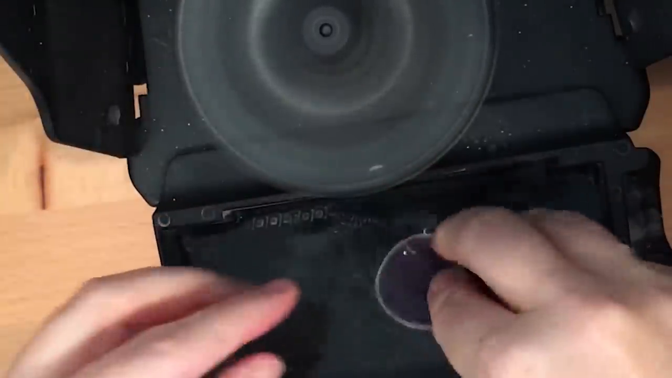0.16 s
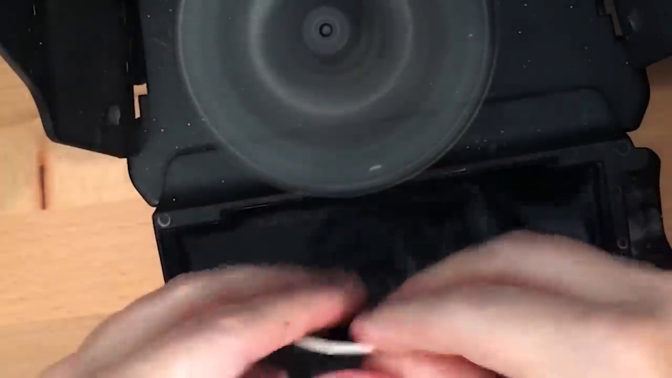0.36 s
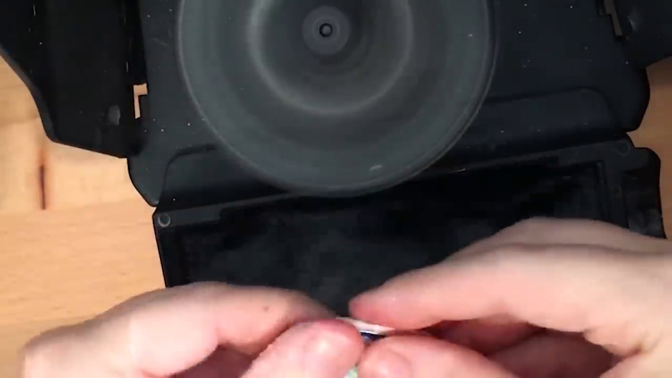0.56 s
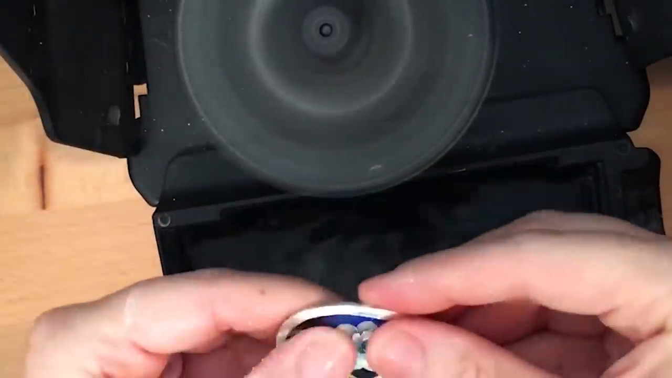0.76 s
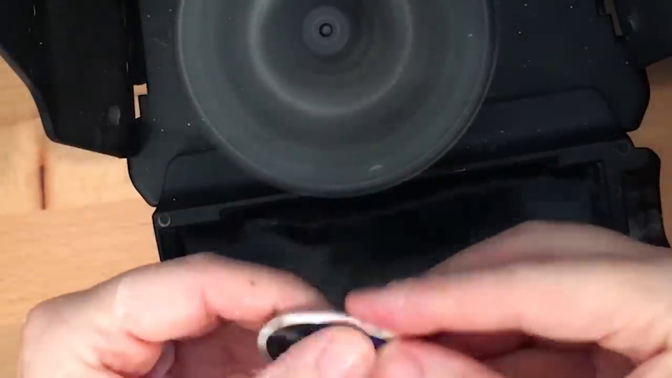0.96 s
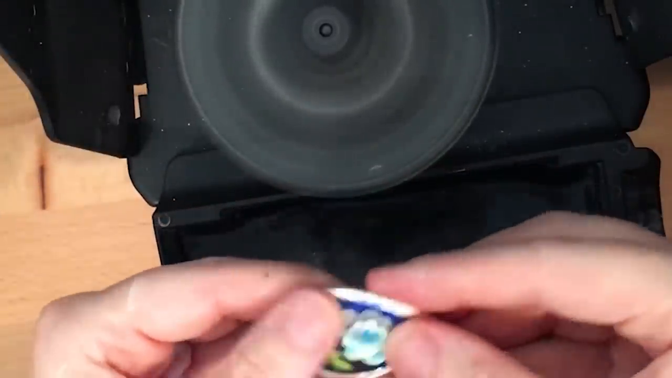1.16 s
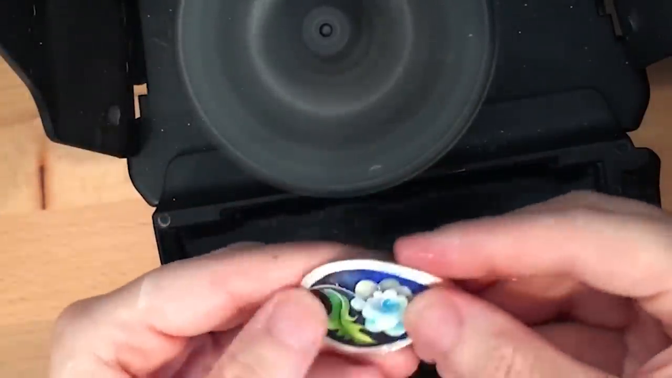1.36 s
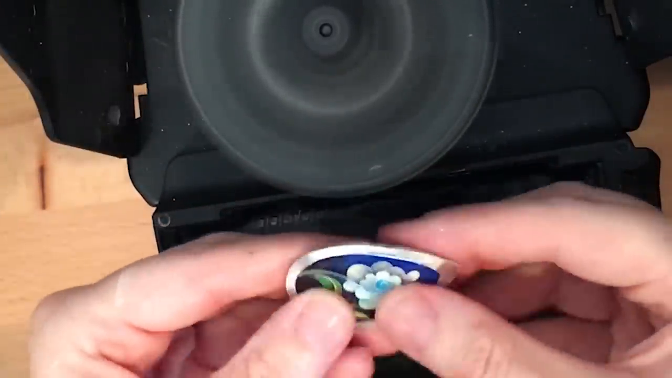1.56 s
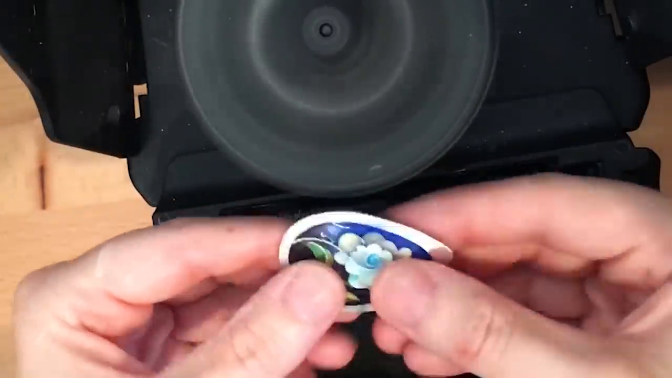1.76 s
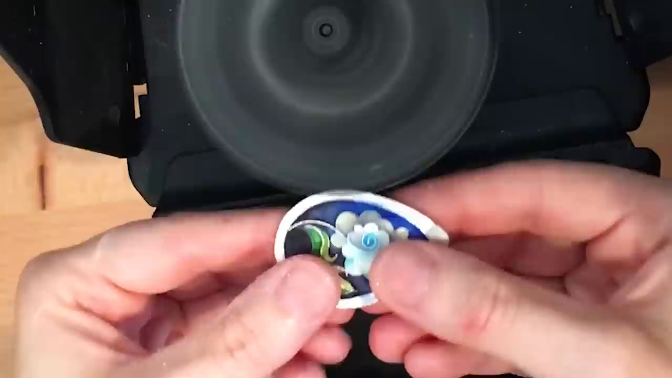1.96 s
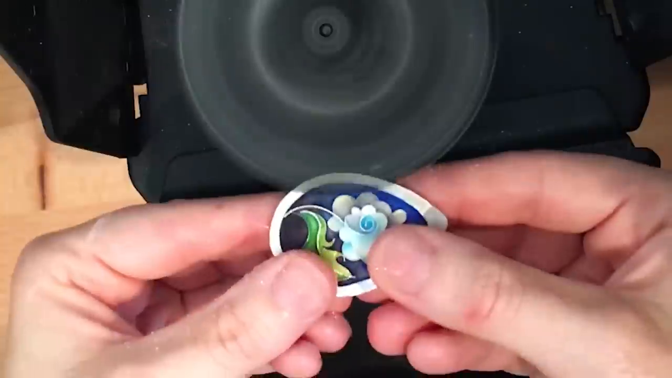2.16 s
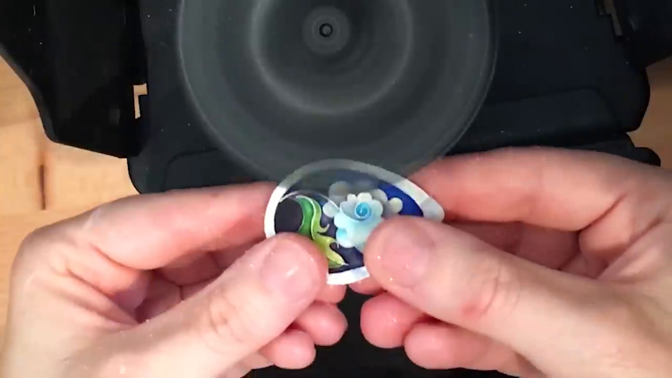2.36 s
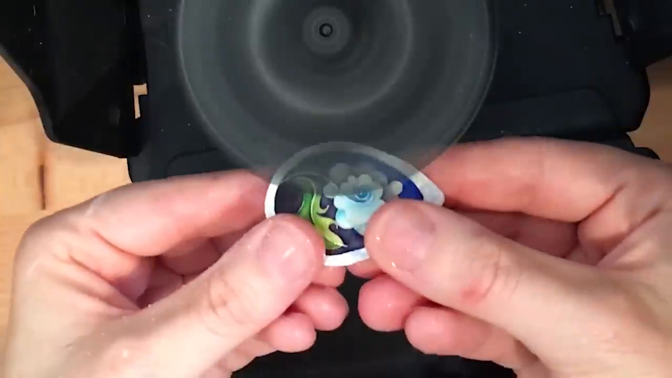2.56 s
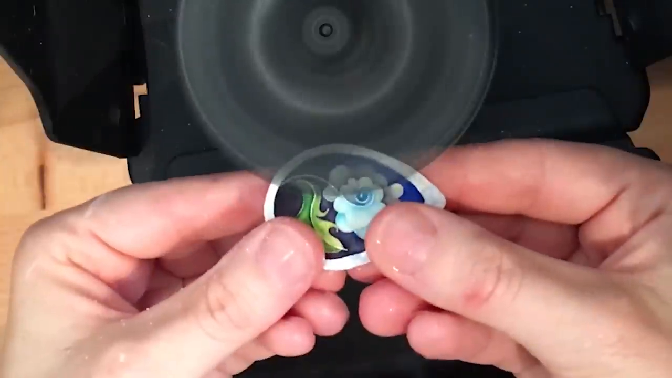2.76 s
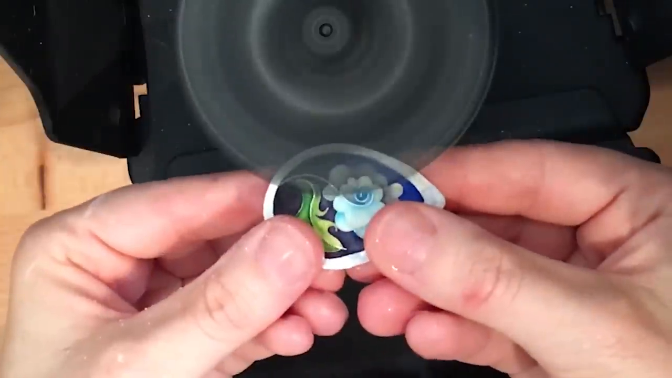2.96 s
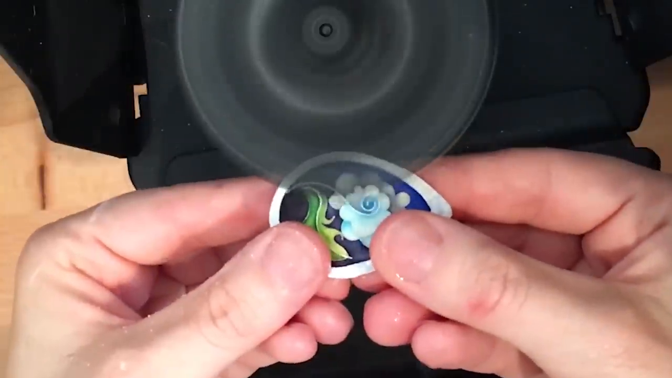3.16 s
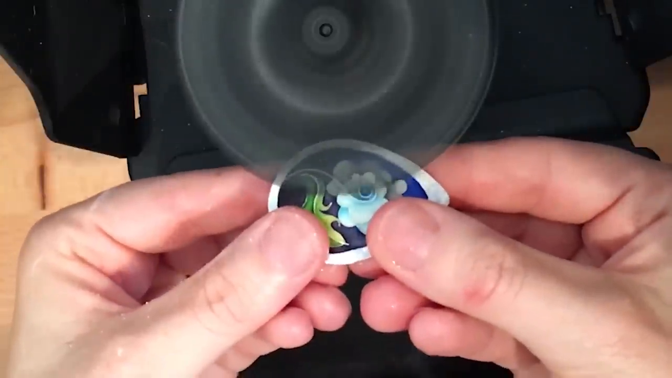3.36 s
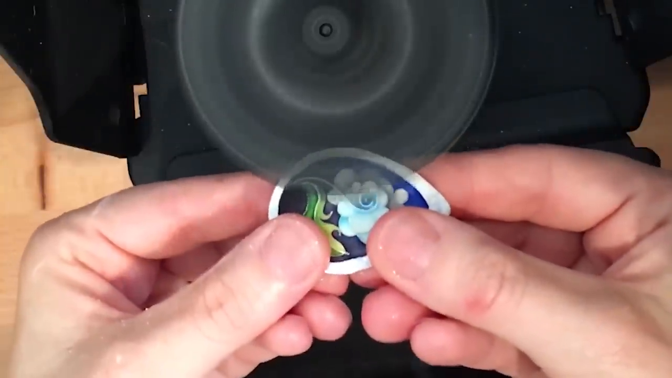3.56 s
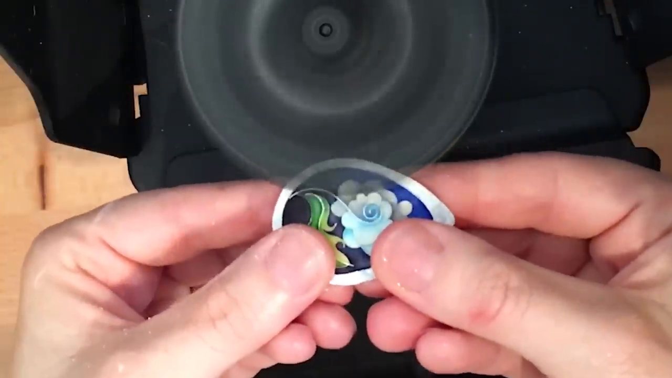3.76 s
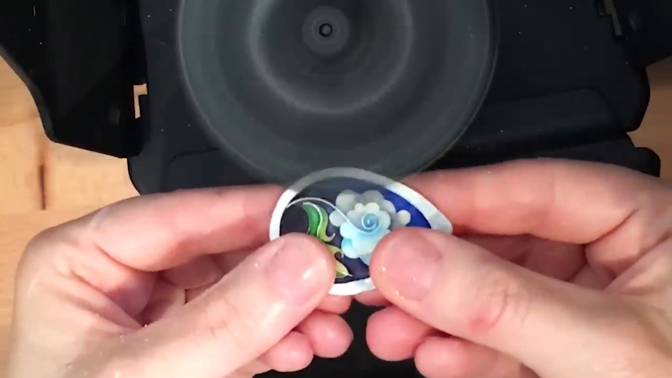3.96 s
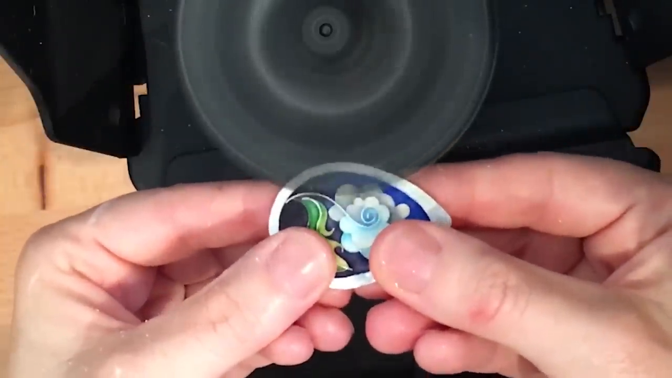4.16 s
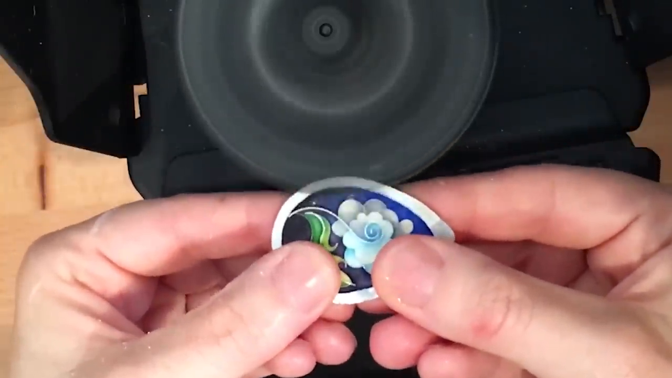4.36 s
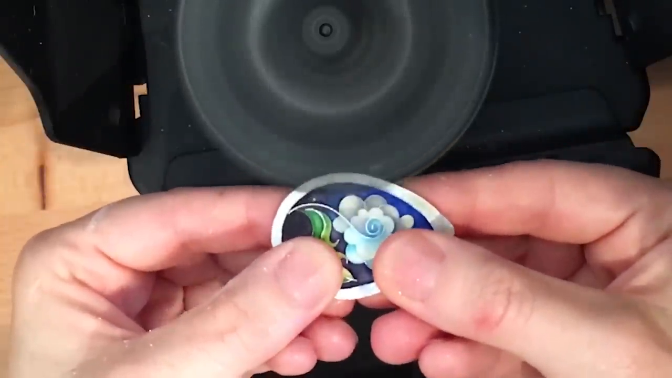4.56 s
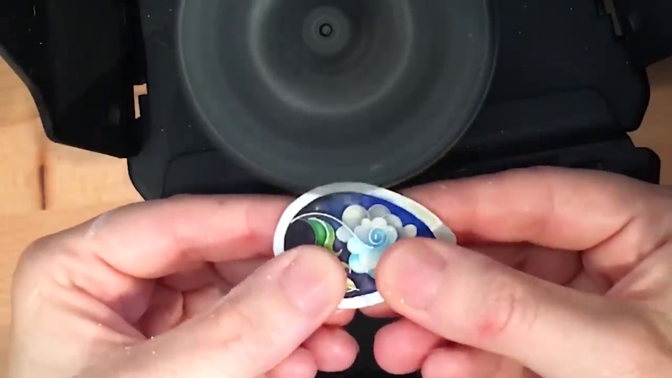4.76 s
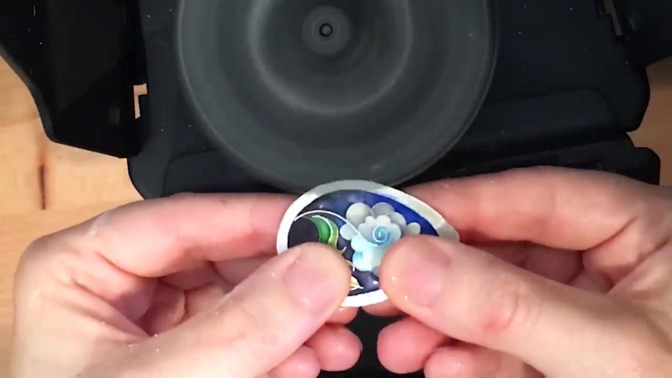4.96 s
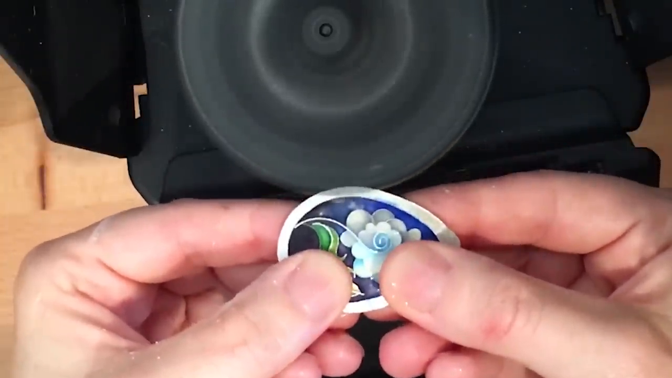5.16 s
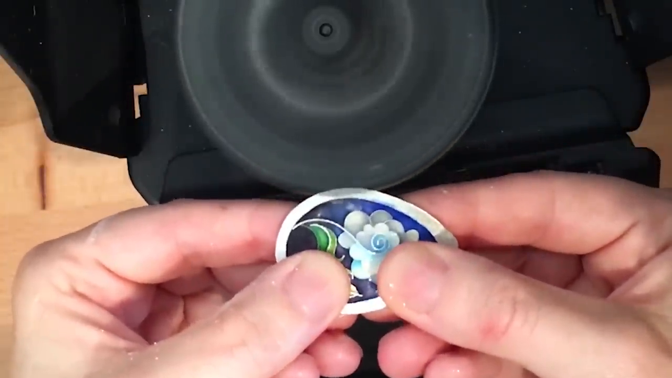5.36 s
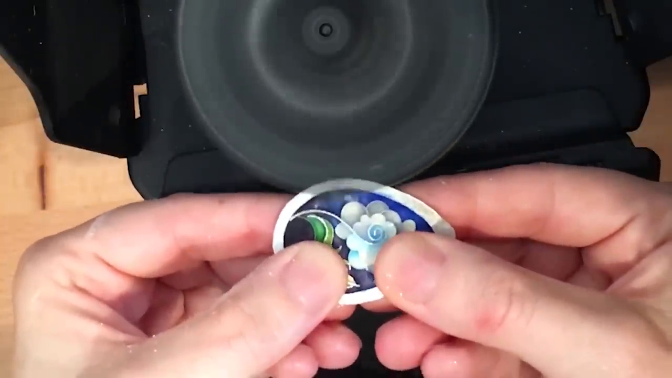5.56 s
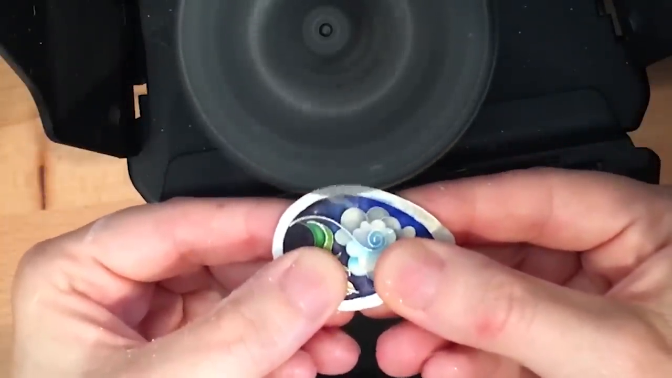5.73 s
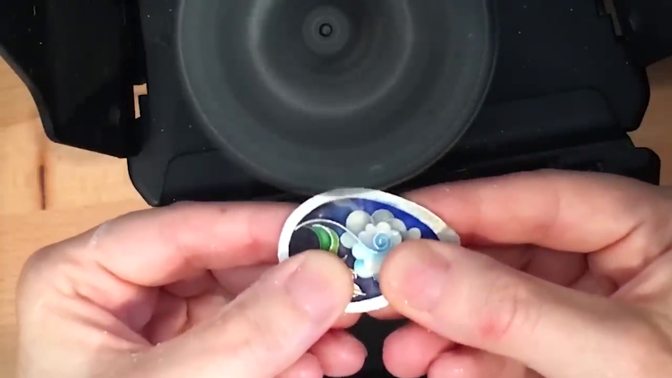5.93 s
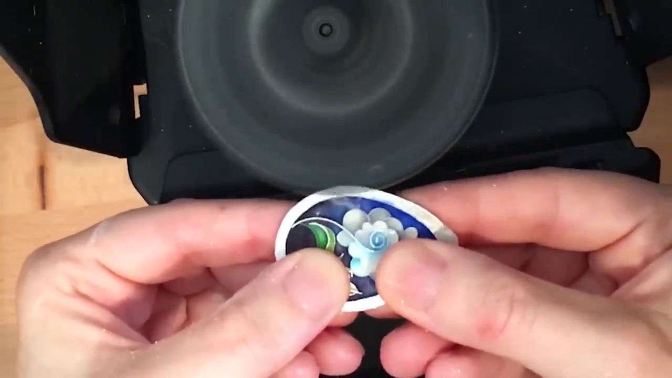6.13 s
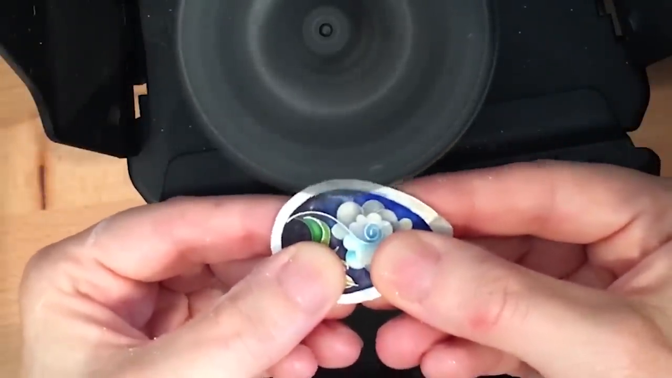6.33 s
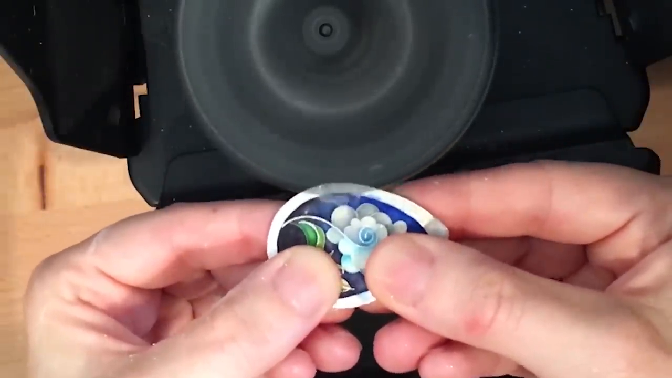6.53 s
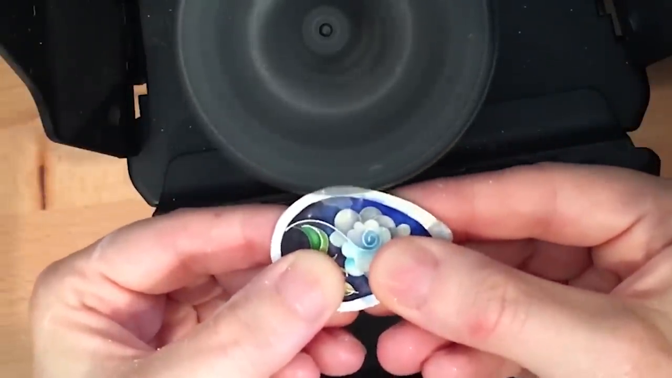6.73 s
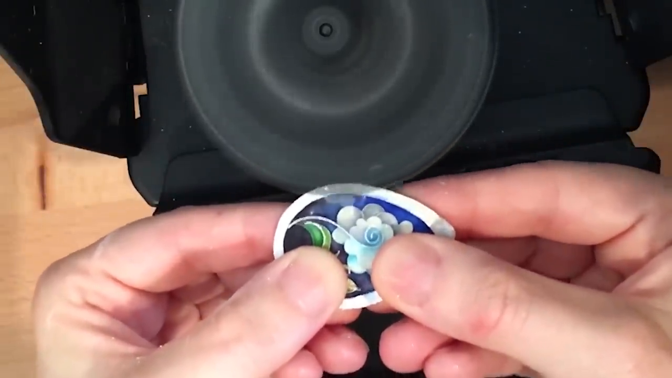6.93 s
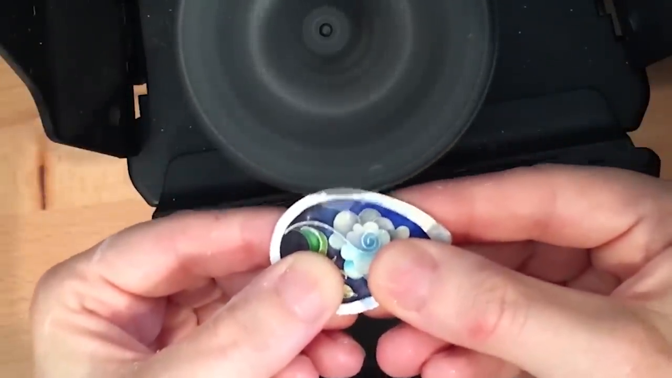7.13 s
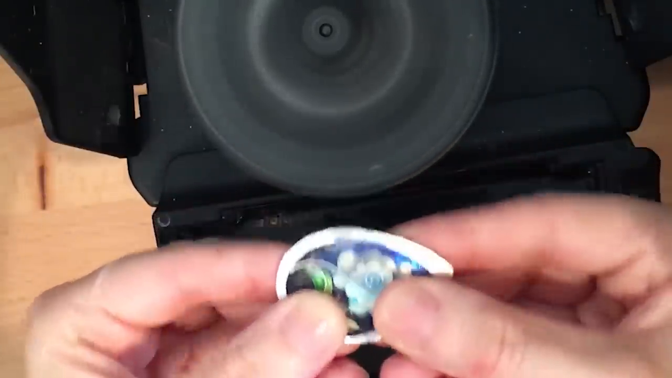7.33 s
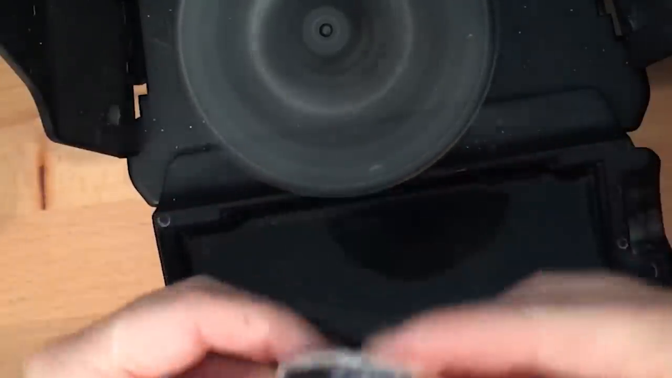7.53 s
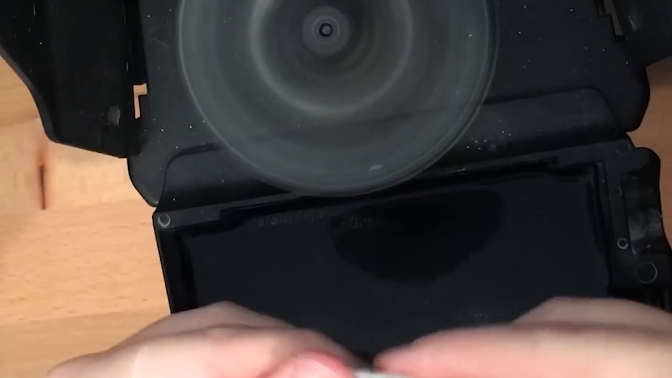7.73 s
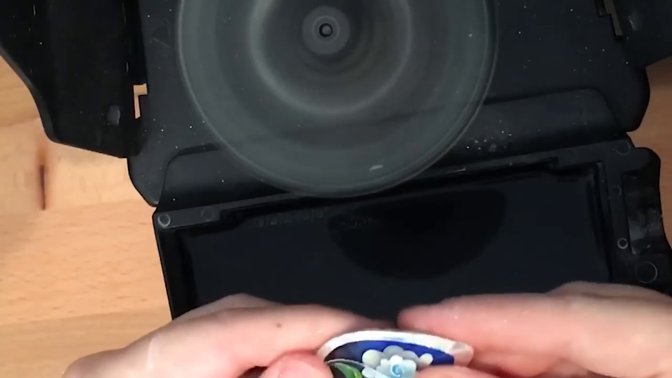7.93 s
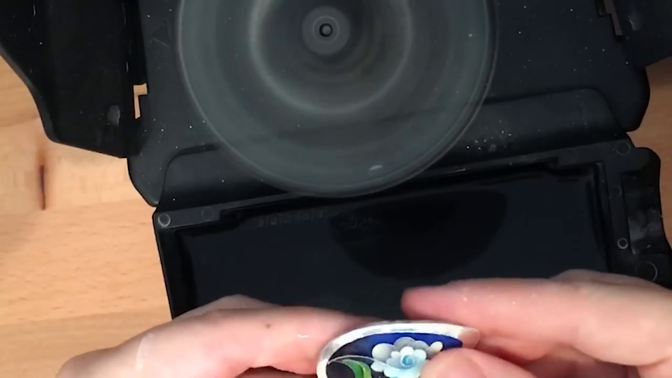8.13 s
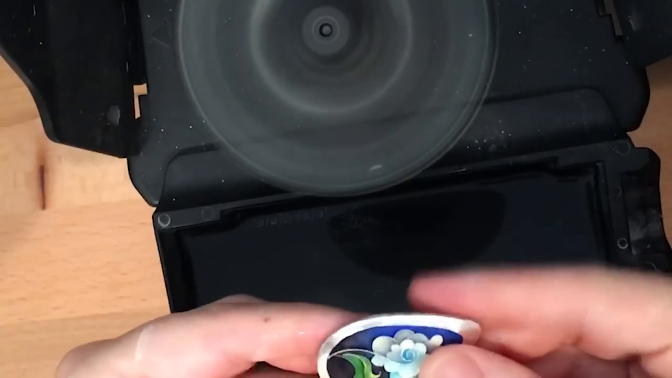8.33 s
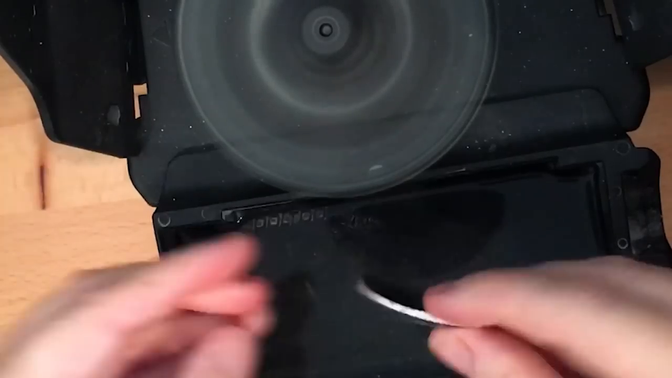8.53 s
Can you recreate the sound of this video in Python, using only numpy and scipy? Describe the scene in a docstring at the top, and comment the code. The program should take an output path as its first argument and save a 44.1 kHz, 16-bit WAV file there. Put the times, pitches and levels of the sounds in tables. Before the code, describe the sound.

Soft knock on a plastic tray over a steady motor, then over four seconds of gritty, chattering glass grinding, ending abruptly back to the hum.

```python
"""Bench grinder on glass

A small bench grinder turns about 33 times a second: whine and hum are sines, brushes and air are filtered noise.
First a piece is knocked and slid on a plastic tray (decaying modes), and fingernails tick on it (noise bursts).
Then a glass-faced metal pendant is held to the wheel for 4.4 s. Rim bumps that come round each turn shake piece
and housing, grit chips the glass, and the load slows the motor. Close microphone, small room."""
import sys
import numpy as np
from scipy import signal
from scipy.fft import rfft, irfft
from scipy.io import wavfile
from scipy.ndimage import uniform_filter1d, map_coordinates

SR = 44100
rng = np.random.default_rng(int(sys.argv[2]) if len(sys.argv) > 2 else 0)


def unload_wav(signal):
    """Save mono or channel-first audio to the path in sys.argv[1] as 16-bit WAV at rate SR, clipped to [-1, 1]."""
    wavfile.write(
        sys.argv[1],
        SR,
        np.round(np.clip(np.atleast_2d(signal).T, -1, 1) * 32767).astype(np.int16),
    )


N = 378819
TIME = np.arange(N) / SR
IDLE_HZ = 33.24  # shaft turns per second, unloaded
TOUCH_S, LIFT_S = 2.808, 7.232


def undb(db):
    """Decibels to gain."""
    return 10 ** (np.asarray(db) / 20)


def unit(x):
    """Scale to rms 1."""
    return x / np.sqrt(np.mean(x ** 2))


def curves(table):
    """Each column of a table joined by straight lines in time."""
    s, *columns = np.transpose(table)
    return [np.interp(TIME, s, column) for column in columns]


def walk(points_per_s):
    """Smooth random drift of rms 1."""
    return unit(map_coordinates(rng.standard_normal(4096), [TIME * points_per_s], order=3, mode="wrap"))


def colour(x, points):
    """Causal minimum-phase filter that follows a (Hz, dB) spectrum."""
    size = 8192
    hz, db = np.transpose(points)
    log_hz = np.log(np.fft.rfftfreq(size, 1 / SR) + 1)
    gain = undb(np.interp(log_hz, np.log(hz), db))
    # folding the cepstrum onto positive time gives minimum phase
    cepstrum = irfft(np.log(gain))[:size // 2]
    cepstrum[0] /= 2
    impulse = irfft(np.exp(rfft(2 * cepstrum, size)))
    return signal.fftconvolve(x, impulse)[:N]


def band(x, hz, width_hz):
    """One resonance, gain 1 at its centre."""
    return signal.lfilter(*signal.iirpeak(hz, hz / width_hz, fs=SR), x)


def between(x, low_hz, high_hz):
    """Steep band-pass."""
    return signal.sosfilt(signal.butter(5, [low_hz, high_hz], "band", fs=SR, output="sos"), x)


def resonate(x, modes):
    """Parallel resonances of a body."""
    return sum(undb(db) * band(x, hz, width_hz) for hz, width_hz, db in modes)


def steady(x):
    """Hold the rms at 1 over about four turns of the wheel."""
    return x / np.sqrt(uniform_filter1d(x ** 2, SR // 8) + 1e-12)


def track(turns, renewals_per_s, waviness=((1, 0), (2, 0))):
    """Roughness that recurs each turn, with a strength per multiple; wear gradually shifts its pattern."""
    multiples = np.arange(int(SR / IDLE_HZ / 2) + 1)
    shifts = .7 * rng.standard_normal((256, len(multiples)))
    phases = 2 * np.pi * rng.random(len(multiples)) + np.cumsum(shifts, axis=0)
    bumps_per_turn, db = np.transpose(waviness)
    strength = undb(np.interp(multiples, np.round(bumps_per_turn), db))
    # one row per renewal, one column per rim angle
    surface = unit(irfft(strength * np.exp(1j * phases)))
    worn = np.cumsum(renewals_per_s * np.ones(N)) / SR
    angle = turns % 1 * surface.shape[1]
    return map_coordinates(surface, [worn, angle], order=3, mode="grid-wrap")


def burst(s, peak_db, hz, width_hz, t60_s):
    """A brief crack: decaying noise through two equal resonances."""
    t = TIME[:SR // 10]
    noise = rng.standard_normal(len(t)) * undb(-60 * t / t60_s)
    crack = band(band(noise, hz, width_hz), hz, width_hz)
    return np.interp(TIME - s, t, crack / np.abs(crack).max(), left=0, right=0) * undb(peak_db)


def wheel_speed(force):
    """Turns per second: load slows the wheel, inertia delays both the sag and the recovery after lifting."""
    sag_hz, inertia_s = 1.0, .065  # sag per unit force
    load = force * (TIME >= TOUCH_S) * (TIME < LIFT_S)
    keep = np.exp(-1 / (inertia_s * SR))
    return IDLE_HZ - sag_hz * signal.lfilter([1 - keep], [1, -keep], load)


def motor(turns):
    """Slot whine locked to the shaft, a wavering hum, and brushes that hiss over twelve commutator bars."""
    # Each row: multiple of the shaft rate, rms level in dB before the whine level.
    whine_lines = [(17, -75), (24, -54.5), (31, -81.5), (34, -73), (35, -52.5), (36, -44.5), (37, -56),
                   (38, -64), (42, -70.5), (43, -68.5), (48, -66.5), (60, -71), (74, -76), (96, -77.5),
                   (113, -76.5), (144, -75.5), (146, -73.5), (263, -80), (276, -67.5), (291, -86),
                   (313, -69), (373, -70)]
    # Whine level. Each row: time in seconds, gain in dB.
    whine_level = [(0, -2), (1.4, -5.5), (2.7, -3.5), (7.4, -2.5), (8.5, -1.5)]
    # Each row: frequency in Hz, rms level in dB.
    hum_lines = [(59, -54.5), (145.3, -58), (285, -63.5), (589, -58.5), (631, -61.5)]
    # Brush hiss spectrum. Each row: frequency in Hz, relative level in dB.
    brush_spectrum = [(1500, -3), (2100, -16), (2480, 0.5), (2900, -6), (3500, -9.5), (3780, 0),
                      (4250, -4.5), (4830, -3), (5300, -4), (6200, -5), (6700, -0.5), (7600, -3.5),
                      (9100, 5.5), (9900, -1), (10500, 4), (13500, -1), (15800, -3.5)]
    whine = 0
    for multiple, db in whine_lines:
        phase = 2 * np.pi * (round(multiple) * turns + rng.random())
        whine = whine + undb(db + 1.2 * walk(6.9)) * np.sin(phase)
    hum = 0
    for hz, db in hum_lines:
        phase = 2 * np.pi * (hz * TIME + 0.092 * walk(21))
        hum = hum + undb(db + 2.0 * walk(5.8)) * np.sin(phase)
    whine_db, = curves(whine_level)
    tones = np.sqrt(2) * (whine * undb(whine_db) + hum)
    bars = 1 + .18 * np.cos(2 * np.pi * 12 * turns) + .15 * np.cos(2 * np.pi * 3 * turns)
    # echoes inside the motor case lift some lines of the brush hiss and sink others
    case = rng.standard_normal(SR // 40) * undb(-60 * TIME[:SR // 40] / 0.11)
    lines = unit(signal.fftconvolve(track(turns, renewals_per_s=1.65), case)[:N])
    brushes = unit(colour(bars * (lines + rng.standard_normal(N)), brush_spectrum))
    return tones + undb(-60.0) * brushes


def draught():
    """Air dragged round by the wheel: a soft rush of shaped noise and a buffet near 9 Hz at the microphone."""
    # Rush spectrum. Each row: frequency in Hz, relative level in dB.
    air_spectrum = [(8.8, -48), (15, -2.5), (65, -30.5), (87, -19.5), (135, -21), (201, -28.5),
                    (279, -24.5), (488, -29), (575, -26.5), (743, -48), (816, -29), (917, -30.5),
                    (1190, -27), (1330, -38.5), (4000, -59), (5200, -70), (8800, -120)]
    rush = unit(colour(rng.standard_normal(N), air_spectrum)) * undb(-49.5 + walk(3.4))
    buffet = unit(band(band(rng.standard_normal(N), 8.8, 10.6), 8.8, 10.6))
    return rush + undb(-43.5) * buffet


def handling():
    """A knock and a short slide ring the tray's modes, a faint scrape lasts throughout; fingernails tick."""
    # Tray modes. Each row: frequency in Hz, relative level in dB, T60 in seconds.
    tray_modes = [(509, -9.5, 0.17), (631, 0, .1), (762, 10, 0.031), (850, -3, 0.084), (1096, -4, 0.086),
                  (1406, 4, 0.022), (1590, -13, 0.065), (1820, -2, 0.031), (2133, 1, 0.028),
                  (2519, -12, 0.04), (3070, -17, 0.037), (3980, -25, .06), (4700, -24, 0.034)]
    # Fingernails on the piece. Each row: start in seconds, peak in dB, centre in Hz, T60 in seconds.
    nail_ticks = [(.414, -35, 12500, .012), (.594, -55, 1920, .03), (.666, -55, 1900, .03),
                  (.738, -59, 3600, .03), (7.529, -42, 3910, 0.013), (7.7487, -36.5, 4150, 0.0087)]
    t = TIME[:SR // 2]
    ring = undb(-60 * t / 0.034) * band(rng.standard_normal(len(t)), 1300, 1500)
    for hz, db, t60_s in tray_modes:
        ring = ring + undb(db - 60 * t / t60_s) * np.sin(2 * np.pi * hz * t + 2 * np.pi * rng.random())
    soft_start = 1 - np.exp(-t / 0.0014)
    knock = np.interp(TIME - .0125, t, ring * soft_start, left=0, right=0) * undb(-22.5)
    scrape = unit(band(signal.fftconvolve(rng.standard_normal(N), ring)[:N], 585, 59.9))
    scratch = band(rng.standard_normal(N), 1600, 1400) * undb(-9.5)
    # end values hold outside the slide
    stroke = np.interp(TIME, [.205, .245, .285, .31], [0.11, 0.79, 0.23, 0.059])
    slide = (scrape + scratch) * stroke * undb(-34.5)
    ticks = sum(burst(s, db, hz, 0.43 * hz, t60_s) for s, db, hz, t60_s in nail_ticks)
    return knock + slide + ticks


def seating(force, harsh):
    """Skip (share of contact on high spots) falls as the piece beds in; rocking (0-1) is rate of force change."""
    skip_first, skip_bedded, skip_harsh = .97, .3, .4  # first touch, bedded in, added at full harshness
    bed_in_s, bed_time_s = 2.99, .1
    rocking_per_s = 8  # force change per second that counts as rocking
    loose = np.exp(-np.maximum(TIME - bed_in_s, 0) / bed_time_s)
    bedded = skip_bedded + skip_harsh * harsh
    skip = np.clip(bedded + (skip_first - bedded) * loose, 0, 1)
    change_per_s = uniform_filter1d(np.abs(np.gradient(force, TIME)), size=SR // 2)
    return skip, np.tanh(change_per_s / rocking_per_s)


def rim_contact(turns, skip):
    """Contact through each turn, for rasp and fine grit: the more skip, the more it falls on the high spots."""
    # Each row: angle in turns, 1/e half-width in turns, rasp level in dB, fine grit level in dB.
    high_spots = [(0.101, 0.11, 6, -9.5), (.42, 0.029, 11.5, -12.5), (.64, 0.072, 2, -3),
                  (0.926, .045, 8, -9)]
    spots = 0
    for at, width, *dbs in high_spots:
        distance = (turns - at + .5) % 1 - .5
        spots = spots + np.outer(undb(dbs), np.exp(-(distance / width) ** 2))
    return [skip * unit(s) + 1 - skip for s in spots]


def growl(turns, skip, renewals_per_s, thud_db, contact):
    """Rim waves sing at multiples of the wheel speed; finer roughness rings piece, housing and base."""
    # Held piece. Each row: frequency in Hz, width in Hz, relative level in dB.
    piece_modes = [(1111, 31, 6), (1271, 42, 10.5), (1429, 18, 9.5), (1752, 23, 1.5), (2070, 210, -13)]
    # Housing. Each row: frequency in Hz, width in Hz.
    housing_modes = [(629, 46), (878, 44)]
    # Rim waviness. Each row: bumps per turn, relative level in dB.
    rim_waviness = [(1, -28), (2, -37), (3, -44), (4, -34), (5, -25), (6, -26.5), (7, -24.5), (8, -21),
                    (9, -42), (10, -24), (11, -28.5), (12, -14), (13, -28), (14, -20), (15, -13),
                    (16, -14.5), (17, -36), (18, -35), (19, -8.5), (20, -13.5), (21, -33), (22, -25),
                    (23, -39), (24, -5.5), (25, -89.5), (26, -36), (27, -6), (28, -2), (29, -17.5),
                    (30, -32), (31, -3.5), (32, -4), (33, -3.5), (34, 1.5), (35, -8.5), (36, -3.5),
                    (37, -39.5), (38, -3), (39, -1), (40, -5.5), (41, -8), (42, -12), (43, -16), (44, -10),
                    (45, -8.5), (46, -20.5), (47, -19), (48, -37), (49, -11), (50, -7.5)]
    bounce = contact ** (.9 * skip ** 5)
    # the wheel runs slightly out of true, so bedded contact throbs once a turn
    runout = 1 + 0.25 * (1 - skip) * np.cos(2 * np.pi * (turns - .55))
    waves = track(turns, renewals_per_s, rim_waviness) * runout * bounce
    rough = track(turns, renewals_per_s) + 0.62 * rng.standard_normal(N)
    rough = rough * runout ** 2 * bounce
    piece = unit(between(resonate(rough, piece_modes), 967, 2195))
    low_mode, high_mode = (unit(between(band(rough, hz, width_hz), 0.861 * hz, 1.127 * hz))
                           for hz, width_hz in housing_modes)
    thud = unit(between(rough, 130.5, 257.5))
    # when the piece bounces or the track wears fast, piece and upper housing mode ring more freely
    free = np.sqrt(renewals_per_s / 20) + skip ** 4
    chatter = unit(between(waves, 1002, 1485)) + undb(-4) * free * piece
    drone = unit(between(waves, 726, 982)) + undb(-2.0) * free * high_mode
    boom = low_mode + unit(between(waves, 498, 657))
    thrum = unit(between(waves, 135, 444)) + undb(thud_db) * thud
    return {"chatter": steady(chatter), "drone": steady(drone), "boom": steady(boom), "thrum": steady(thrum)}


def chipping(turns, contact, skip, spread_db, flurry_db):
    """Tiny fractures of very unequal size, in flurries; the more skip, the more the same grains recur."""
    sizes = undb(spread_db * np.minimum(rng.exponential(size=N), 6))
    fresh = unit(rng.standard_normal(N) * sizes * undb(flurry_db * walk(650)))
    repeat = skip ** 3  # share of power that recurs each turn
    recurring = track(turns, renewals_per_s=3.21)
    return contact * (np.sqrt(repeat) * recurring + np.sqrt(np.abs(1 - repeat)) * fresh)


def flaking(turns):
    """The same high spot comes round and knocks off one flake each turn of a run, each 0.1 dB louder."""
    # Runs of flakes. Each row: start in seconds, number of flakes, first peak in dB, centre in Hz.
    flake_runs = [(3.1812, 4, -8.5, 5630), (5.1303, 5, -13, 5850), (5.4086, 1, -10, 5832),
                  (5.4158, 1, -10.5, 5770), (7.114, 1, -11, 5230)]
    out = np.zeros(N)
    for s, count, db, hz in flake_runs:
        first_turn = np.interp(s, TIME, turns)
        for k in range(round(count)):
            at_s = np.interp(first_turn + k, turns, TIME)
            out += burst(at_s, db + k * 0.1, hz, width_hz=1040, t60_s=0.017)
    return out


def grinding(turns, force):
    """The growl of the held piece and the hiss of grit chipping the glass; every voice swells with the force."""
    # Harshness of the cut, highest while the glass edge is still sharp.
    # Each row: time in seconds, harshness from 0 = smooth growl to 1 = all chipping.
    harshness = [(2.81, 0.92), (3.04, 0.56), (3.13, 0.75), (3.32, 0.56), (3.73, 0.64), (3.77, 0.29),
                 (4.05, 0.49), (4.21, 0.27), (4.38, 0.48), (4.5, 0.29), (5.08, 0.28), (5.14, 0.35),
                 (5.36, 0.1), (5.44, 0.42), (5.59, 0.33), (6.06, 0.23), (6.51, 0.38), (7.21, 0.27)]
    # Each voice: dB at unit force, dB per doubling of force, dB added at full harshness, dB added at full rocking.
    voices = {"chatter": (-14, 2.5, -6.5, -4), "drone": (-19, 4.5, -13.5, -3), "boom": (-29, 5, -4.5, 3.5),
              "thrum": (-35.5, 4, 2.2, -1.9), "rasp": (-30.5, 3.5, 14, -1.5),
              "grit": (-26.5, 2.5, 16, -1.5)}
    # Coarse rasp spectrum. Each row: frequency in Hz, relative level in dB.
    rasp_spectrum = [(100, -40), (700, -18), (1500, -8.5), (2200, -6), (2750, -13.5), (3000, -9),
                     (3300, -19), (3650, 1), (4150, -6), (4450, 0), (4800, -5), (5500, 0.5), (6400, -1),
                     (7300, -7.5), (9500, -15)]
    # Fine grit spectrum. Each row: frequency in Hz, relative level in dB.
    grit_spectrum = [(200, -54), (4000, -33), (7200, -13.5), (8300, 1.5), (9200, 4.5), (9900, 0.5),
                     (11100, 6.5), (12800, -2.5), (15800, -2)]
    # Lingering modes of wheel and guard. Each row: frequency in Hz, width in Hz, level in dB.
    wheel_modes = [(630, 7, 7), (1067, 9, 16.5), (1332, 5, 19.5), (2210, 4.7, 10), (4200, 7, -1)]
    harsh, = curves(harshness)
    skip, rocking = seating(force, harsh)
    gain = {}
    for name, (db, force_db, harsh_db, rocking_db) in voices.items():
        gain[name] = undb(db + force_db * np.log2(force) + harsh_db * harsh + rocking_db * rocking)
    touching = (TIME >= TOUCH_S) * np.exp(-np.maximum(TIME - LIFT_S, 0) / 0.0028)
    coarse_contact, fine_contact = rim_contact(turns, skip)
    renewals_per_s = 6 + 20 * rocking  # a rocking hand renews the rim track faster
    thud_db = -16.5 + 24.5 * harsh
    parts = growl(turns, skip, renewals_per_s, thud_db, coarse_contact)
    # each growling voice swells and fades a little as the contact point shifts
    body = sum(part * gain[name] * undb(0.8 * walk(9)) for name, part in parts.items())
    coarse = chipping(turns, coarse_contact, skip, spread_db=1.5, flurry_db=2.7)
    fine = chipping(turns, fine_contact, skip, spread_db=3.0, flurry_db=3.5)
    rasp = steady(colour(coarse, rasp_spectrum)) * gain["rasp"]
    grit = steady(colour(fine + 0.26 * coarse, grit_spectrum)) * gain["grit"]
    ring = between(resonate(touching * coarse * gain["rasp"], wheel_modes), 900, 5000)
    return touching * body + ring, touching * (rasp + grit) + flaking(turns)


def room(x, wet_db, t60_low_s, t60_high_s):
    """A diffuse noise tail from 4 ms on, with separate decays below and above 3 kHz."""
    t = TIME[:SR]
    low = signal.sosfilt(signal.butter(2, 3000, fs=SR, output="sos"), rng.standard_normal(SR))
    high = signal.sosfilt(signal.butter(2, 3000, "high", fs=SR, output="sos"), rng.standard_normal(SR))
    tail = low * undb(-60 * t / t60_low_s) + 0.5 * high * undb(-60 * t / t60_high_s)
    tail = tail * (t > .004)
    return x + undb(wet_db) * signal.fftconvolve(x, tail / np.sqrt(np.sum(tail ** 2)))[:N]


def scene():
    """One shaft drives both motor and wheel; pressing the piece slows it and makes it grind."""
    # Hand force on the wheel. Each row: time in seconds, force (1 = an ordinary press).
    press = [(2.81, 0.22), (3.01, 0.35), (3.21, 1.79), (3.36, 0.31), (3.41, 0.84), (3.67, 2.1),
             (3.82, 0.68), (4.01, 1.27), (4.12, 0.73), (4.29, 1.06), (4.4, 1.27), (4.47, 0.92),
             (4.89, 0.97), (4.96, 0.52), (5.23, 1.17), (5.35, 0.66), (5.41, 1.63), (5.57, 0.28),
             (5.81, 1.3), (5.86, 3), (5.99, 0.24), (6.01, 0.25), (6.22, 2.09), (6.3, 0.25), (6.35, 0.21),
             (6.38, 0.73), (6.47, 0.76), (6.6, 1.93), (6.67, 1.94), (6.71, 0.42), (6.86, 1.64),
             (7.07, 1.03), (7.13, 2.02), (7.21, 0.83)]
    force = np.maximum(curves(press)[0], .05)
    turns = np.cumsum(wheel_speed(force) + 0.013 * walk(5)) / SR
    turns = turns - np.interp(TOUCH_S, TIME, turns)  # angle 0 at first touch
    machine = motor(turns) + draught()
    hands = room(handling(), wet_db=-14.0, t60_low_s=0.3, t60_high_s=.3)
    body, hiss = grinding(turns, force)
    wheel = room(body, wet_db=-13.5, t60_low_s=0.43, t60_high_s=0.33)
    wheel = wheel + room(hiss, wet_db=-12.0, t60_low_s=0.44, t60_high_s=0.34)
    return (machine + hands + wheel)[None]


def record(dry):
    """The microphone rounds the highest peaks and the top is cut off at 15.85 kHz."""
    top = signal.ellip(10, .1, 50, 15850, fs=SR, output="sos")
    heard = signal.sosfiltfilt(top, dry)
    rounded = heard / (1 + (heard / .72) ** 4) ** .25  # levels off at 0.72
    return signal.sosfiltfilt(top, rounded)


dry = scene()
out = record(dry)
unload_wav(out)
```